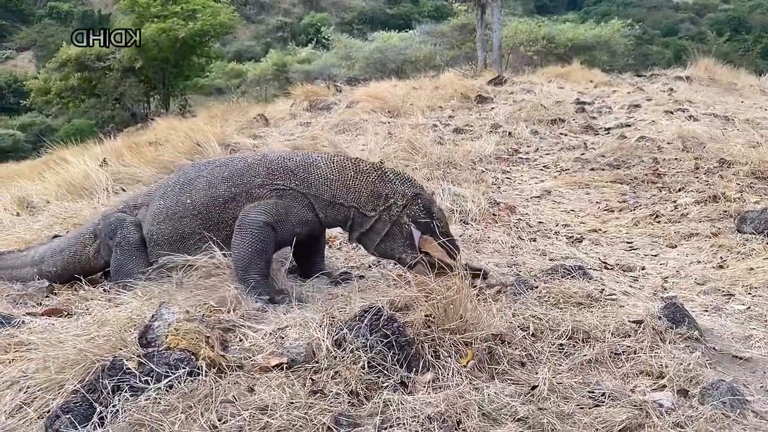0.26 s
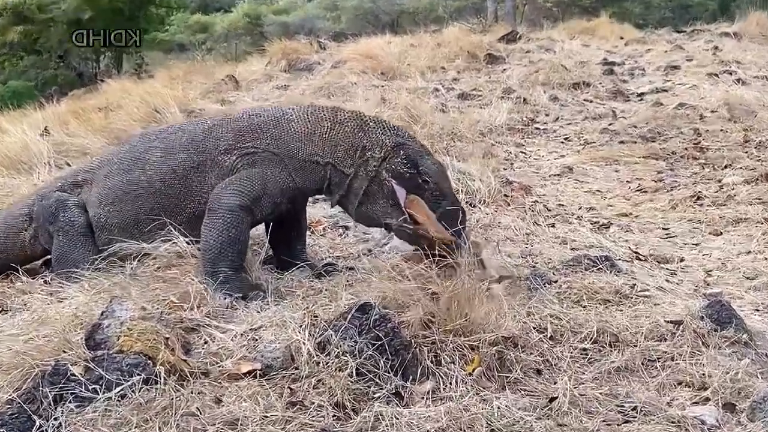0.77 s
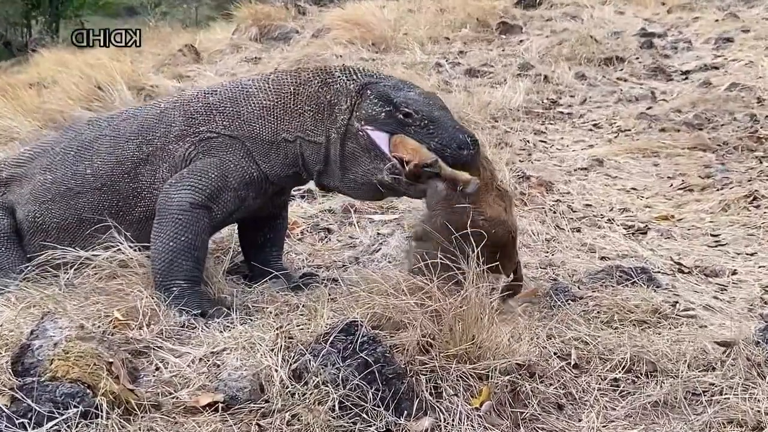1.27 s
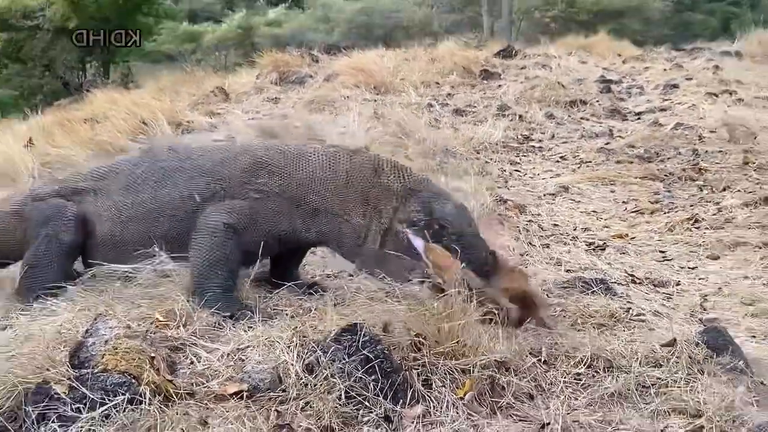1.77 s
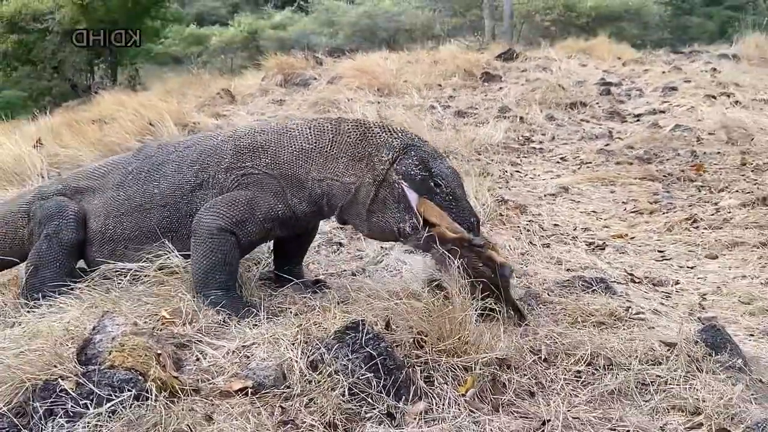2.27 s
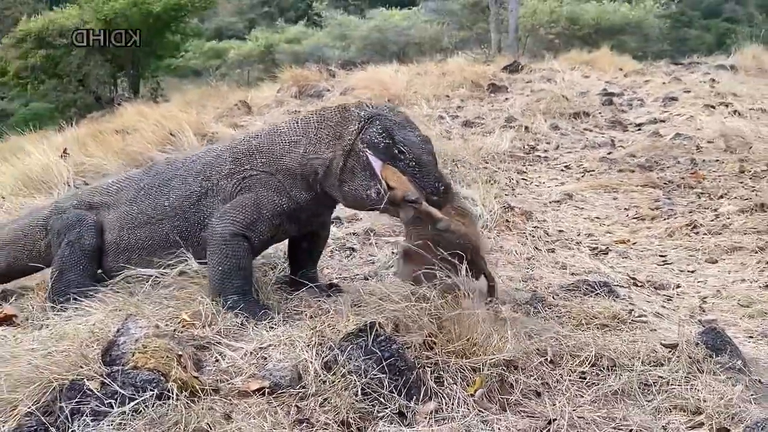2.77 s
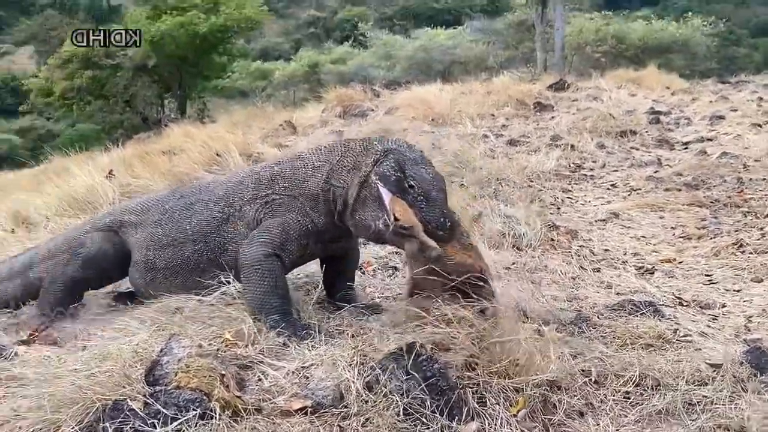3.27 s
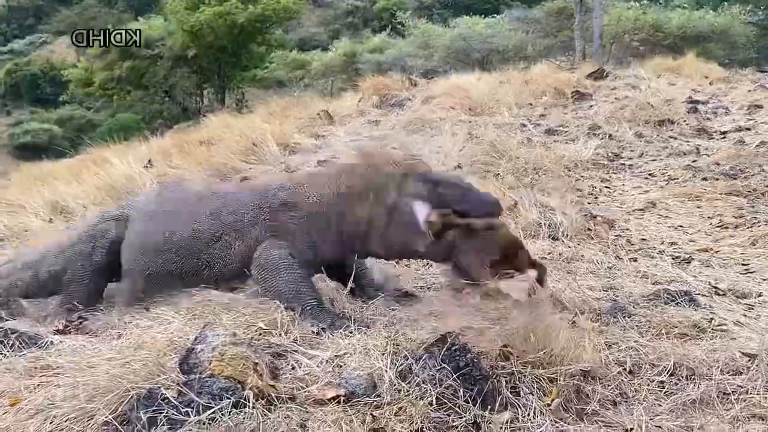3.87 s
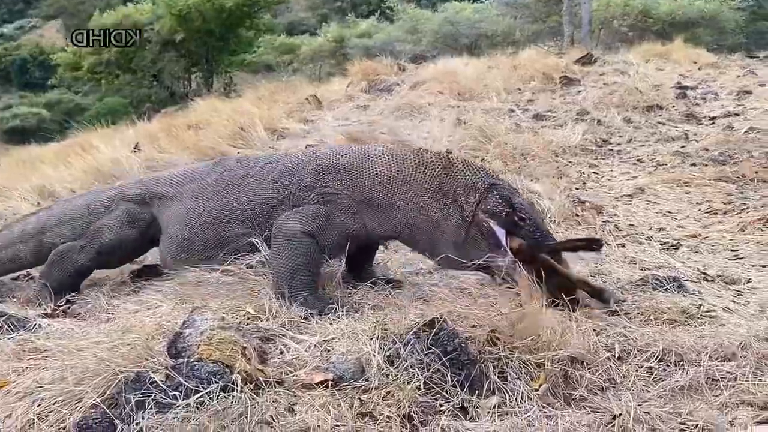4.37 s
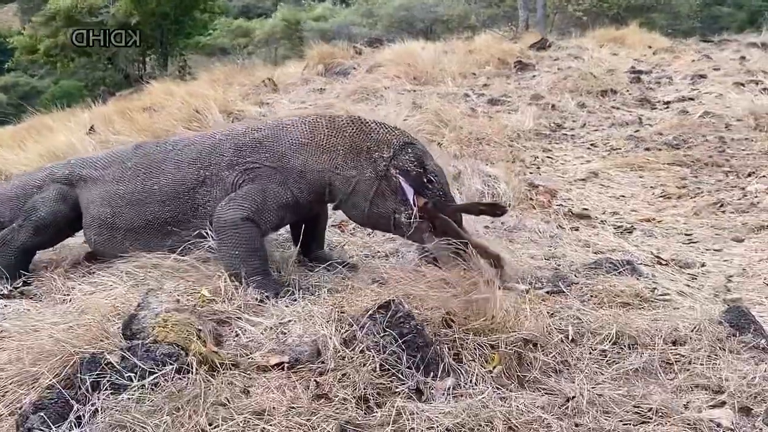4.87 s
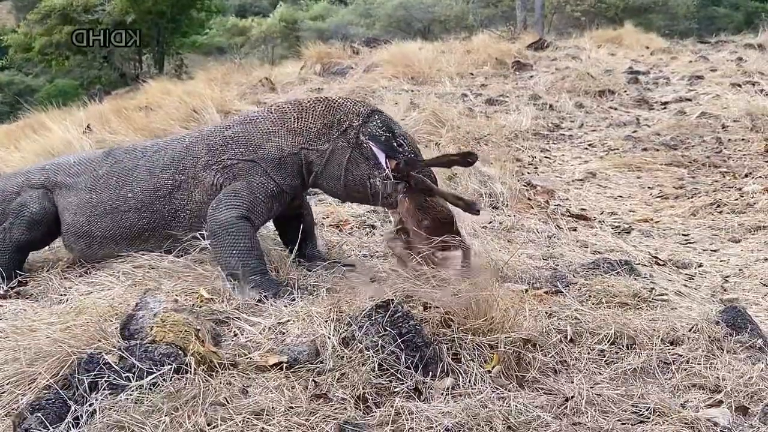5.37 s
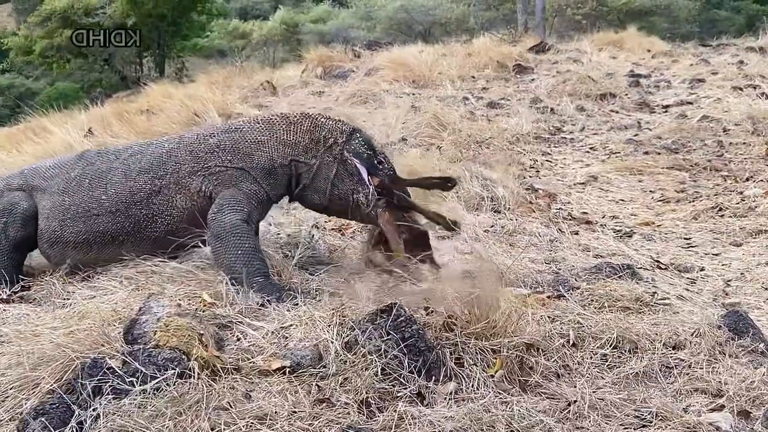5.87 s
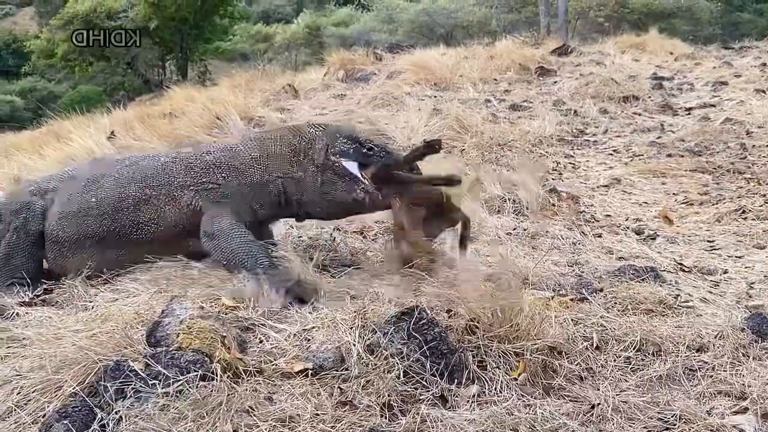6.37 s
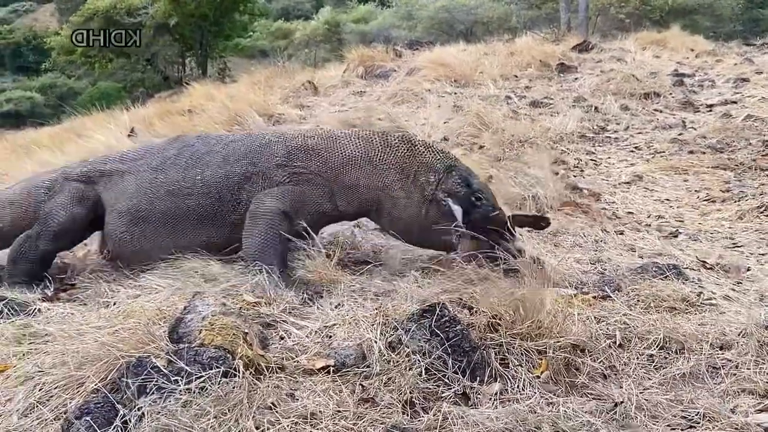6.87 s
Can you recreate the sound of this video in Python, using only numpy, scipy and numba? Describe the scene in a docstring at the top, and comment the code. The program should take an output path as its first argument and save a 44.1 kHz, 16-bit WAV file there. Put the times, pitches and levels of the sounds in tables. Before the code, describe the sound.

Gusty wind roars, rumbles and thumps on the microphone, with a very faint rustle of dry grass underneath.

```python
"""Gusty wind on a dry hillside

Wind buffets the two microphone ports of a hand-held camera, stronger on the left. Small eddies roar
and sputter, brighter the faster the air, with a lull in the middle; sharp ones slap the ports and
large ones rumble and thump. Far beneath, dry grass hisses and ticks as a big lizard thrashes a carcass."""
import sys
import numpy as np
from scipy import signal
from scipy.fft import rfft, irfft
from scipy.io import wavfile
from scipy.ndimage import uniform_filter1d, minimum_filter1d
from numba import njit

SR = 44100
rng = np.random.default_rng(int(sys.argv[2]) if len(sys.argv) > 2 else 0)


def output_pcm(signal):
    """Save a mono or channel-first signal as 16-bit PCM at the path in sys.argv[1].

    Samples are clipped to [-1, 1] before scaling.
    """
    pcm = np.clip(np.atleast_2d(signal).T, -1, 1) * 32767
    wavfile.write(sys.argv[1], SR, np.round(pcm).astype(np.int16))


N = 313992
TIME, BINS = np.arange(N) / SR, np.fft.rfftfreq(N, 1 / SR)

# Levels and corners in the tables are base values; each layer trims them.
# Bed of rustling grass: time_s, level_db
GRASS_BED = [(0.0, -59), (1.3, -56), (1.8, -53), (2.15, -56), (2.6, -51.5), (3.3, -50), (4.6, -51),
             (6.65, -50), (7.1, -54.5)]
# The carcass sweeps through the stalks: time_s, half_length_s, level_db
CARCASS_SWISHES = [(0.03, 0.03, -53.5), (1.553, 0.04, -52.5), (1.703, 0.038, -47), (3.28, .025, -51),
                   (4.005, 0.06, -49.5)]
# Tone of the dry stalks: frequency_hz, relative_db
GRASS_TONE = [(150, -11), (500, 3.5), (900, 4), (1600, 1.5), (2400, 1.5), (3100, -0.5), (4700, 2),
              (6100, 0.5), (6650, 2.5), (7400, -0.5), (9000, -2.5), (11000, -3.5), (13500, -5), (15500, -9)]
# How alike the rustle is left and right: frequency_hz, correlation
GRASS_LIKENESS = [(300, 0.039), (900, -0.066), (1500, -0.6), (2300, 1), (7000, 1), (15000, 1)]
# The rustle's short waves reach the ports out of step: frequency_hz, phase_rad
GRASS_PORT_PHASE = [(7400, 0), (9000, 3.14), (11200, 6.28), (13200, 9.42), (15000, 12.57)]

# Bed of wind between gusts: time_s, roar_db, rumble_db
WIND_BED = [(0.05, -69, -63), (.1, -51, -45), (.41, -44, -40), (.48, -28, -25.5), (.95, -26, -26),
            (1.28, -31, -28.5), (1.45, -24.5, -27.5), (2.3, -21, -18.5), (2.46, -17.5, -21.5),
            (2.78, -19.5, -20), (3.06, -46.5, -33), (3.522, -35, -38.5), (3.72, -51, -41.5),
            (3.82, -80, -62), (3.96, -60, -54), (4.07, -31, -36), (4.22, -28.5, -27.5), (5.2, -26.5, -24.5),
            (5.44, -18.5, -21), (6.48, -22, -22), (7.11, -17.5, -17.5)]
# Pressure swings of the largest eddies: frequency_hz, relative_db
RUMBLE_TONE = [(12, -49), (25, -39), (35, -14.5), (48, -7), (66, -2.5), (90, -3.5), (125, -8), (170, -10),
               (280, -18), (600, -106)]
# Large eddies thump the microphone: time_s, half_length_s, level_db, pitch_hz
EDDY_THUMPS = [(0.699, 0.015, -13.5, 68), (0.776, 0.014, -20.5, 80), (1.35, 0.018, -20.5, 75),
               (1.474, 0.021, -20, 89.9), (1.622, .02, -17.5, 93), (1.945, 0.02, -16, 100.4),
               (2.045, .016, -17, 75), (2.338, .01, -16.5, 149.8), (2.64, 0.0057, -10.5, 220.4),
               (2.759, 0.018, -11.5, 70.1), (2.94, .02, -21, 100), (3.45, 0.028, -23, 64.8),
               (3.585, 0.027, -26, 65), (3.738, .018, -39, 85), (4.115, 0.015, -13.5, 102),
               (5.207, .016, -19, 85.2), (5.654, .018, -17, 89.8), (5.693, .014, -19, 84),
               (5.868, 0.014, -19, 100), (6.02, .016, -19.5, 70), (6.075, 0.016, -15, 115),
               (6.172, 0.011, -17.5, 140), (6.21, 0.017, -17.5, 90.2), (6.387, .016, -17.5, 58),
               (6.655, .016, -21, 55)]
# Hollow notes within some of the slaps: time_s, half_length_s, level_db, pitch_hz
RIM_NOTES = [(1.763, .005, -23, 1130), (1.857, .005, -28, 1080), (2.731, .003, -22, 1800),
             (4.512, .004, -33, 1100), (4.527, .003, -27.5, 1200), (4.571, .003, -42, 1420),
             (4.749, 0.0046, -33, 960), (5.875, .004, -23, 1350), (6.066, .0022, -21, 1700),
             (6.064, .002, -26.5, 2750), (6.238, .0025, -30, 1680)]
# Gusts riding on the bed: start_s, length_s, level_db, corner_hz
WIND_GUSTS = [(0.126, .04, -40, 190), (0.28, 0.048, -33.5, 220), (.355, .012, -41, 230),
              (.514, .02, -20, 370), (0.56, 0.082, -20.5, 403), (0.625, 0.058, -20, 660),
              (0.8, 0.041, -26, 380), (0.875, 0.038, -27, 644), (0.997, 0.09, -20, 536),
              (1.158, .03, -30, 480), (1.365, 0.034, -28, 560), (1.404, 0.077, -20.5, 614),
              (1.59, 0.041, -21, 645), (1.673, 0.038, -22, 846), (1.775, 0.042, -19, 970),
              (1.924, .13, -15.5, 890), (2.107, 0.023, -16.5, 775), (2.153, 0.017, -17, 1040),
              (2.381, 0.058, -15.5, 1060), (2.502, 0.16, -21.5, 1430), (2.683, 0.073, -16, 1100),
              (2.888, 0.052, -22.5, 570), (2.962, 0.021, -26.5, 340), (3.128, .012, -38, 200),
              (3.234, 0.041, -31.5, 190), (3.408, 0.064, -24, 390), (3.564, 0.039, -32.5, 270),
              (4.08, 0.044, -21, 596), (4.453, 0.13, -22, 474), (4.681, 0.053, -25, 520),
              (5.002, 0.11, -25, 440), (5.173, 0.032, -19.5, 380), (5.253, 0.03, -22.5, 580),
              (5.301, 0.02, -16.5, 646), (5.391, 0.071, -17, 1014), (5.596, 0.068, -19.5, 1210),
              (5.71, 0.028, -16.5, 900), (5.835, 0.038, -15, 1230), (6.07, 0.079, -18, 950),
              (6.351, 0.11, -20, 910), (6.57, 0.098, -18, 1040), (6.711, 0.11, -17.5, 1230),
              (6.828, 0.089, -18, 1230), (7.06, 0.027, -18.5, 1050)]
# Moments when the wind drops: time_s, half_length_s, depth_db
WIND_LULLS = [(0.473, .006, 8), (0.499, 0.012, 7), (0.71, 0.022, 5.5), (1.137, 0.019, 14), (1.29, .028, 7),
              (1.832, 0.01, 7.5), (1.913, .009, 4), (2.097, 0.0093, 6), (2.144, .006, 5),
              (2.313, 0.017, 5.5), (2.492, .01, 3), (2.567, .005, 5), (2.674, .006, 6), (2.857, .016, 4),
              (3.105, 0.018, 3), (3.357, 0.026, 2), (4.16, 0.025, 5.5), (4.375, .014, 3),
              (4.437, 0.0098, 5.5), (4.613, 0.022, 6), (4.674, .008, 3), (4.775, .012, 5),
              (4.95, .012, 4.5), (4.986, .012, 6), (5.144, 0.015, 13), (5.345, .022, 4), (5.486, .008, 7),
              (5.593, .006, 6), (5.787, 0.027, 3), (5.91, 0.024, 4), (6.034, 0.021, 12.5),
              (6.233, 0.018, 3), (6.33, 0.012, 4), (6.703, 0.0048, 7), (6.965, 0.011, 5.5)]
# Sharp eddies slap the ports: start_s, length_s, level_db, centre_hz, width_hz
EDDY_SLAPS = [(0.433, 0.009, -11, 290, 330), (0.45, .012, -24.5, 230, 740), (.479, .006, -26, 200, 480),
              (0.679, 0.009, -18, 330, 880), (0.767, 0.0055, -13.5, 430, 704),
              (1.062, 0.0072, -18, 200, 980), (1.212, 0.012, -13.5, 494, 540),
              (1.266, 0.0027, -28.5, 450, 650), (1.33, 0.018, -17, 490, 583),
              (1.419, .007, -17.5, 100, 1150), (1.554, .003, -25, 700, 700), (1.592, .018, -16, 252, 530),
              (1.757, 0.01, -11.5, 280, 816), (1.775, 0.005, -21, 300, 1490),
              (1.848, 0.019, -20.5, 400, 700), (1.923, 0.025, -13, 100, 1200),
              (1.956, 0.017, -9.5, 250, 800), (2.015, .028, -17, 150, 900), (2.151, .006, -15, 100, 1250),
              (2.167, 0.007, -17, 100, 1860), (2.244, 0.024, -18, 382, 970),
              (2.384, 0.005, -15.5, 200, 1500), (2.394, .004, -12.5, 200, 1850),
              (2.426, 0.0047, -12, 100, 1500), (2.501, .003, -23, 300, 2200), (2.519, .004, -17, 200, 1900),
              (2.552, .005, -14, 200, 1800), (2.572, .005, -17, 400, 2000), (2.679, .01, -17, 600, 1800),
              (2.713, 0.024, -11.5, 220, 1160), (2.7255, 0.005, -11, 700, 2150),
              (2.789, 0.0099, -9, 540, 700), (2.828, .008, -20, 400, 950), (3.21, 0.0028, -34.5, 300, 750),
              (3.332, 0.0047, -40.5, 350, 450), (3.441, 0.0062, -15, 100, 493),
              (3.53, 0.0076, -20.5, 290, 500), (3.598, .004, -29, 250, 650),
              (3.712, 0.021, -40.5, 170, 260), (4.097, .005, -17, 550, 680), (4.112, .011, -20, 100, 900),
              (4.458, .004, -18.5, 300, 750), (4.507, .01, -23, 200, 900), (4.56, 0.0082, -20.5, 100, 890),
              (4.647, 0.0028, -22, 300, 600), (4.682, 0.0076, -15, 430, 390),
              (4.728, 0.0028, -20, 524, 900), (4.792, 0.0023, -22.5, 600, 750),
              (4.809, .003, -27, 600, 600), (4.825, .003, -26, 600, 600), (4.923, 0.0067, -23.5, 400, 600),
              (4.964, 0.0064, -29, 600, 600), (5.008, 0.0034, -19.5, 398, 546),
              (5.046, 0.0094, -23.5, 397, 680), (5.183, 0.0019, -21.5, 100, 1450),
              (5.306, .008, -15, 380, 550), (5.318, 0.0027, -17, 398, 1120),
              (5.496, 0.0066, -16.5, 190, 1350), (5.6, 0.0078, -15.5, 100, 1650),
              (5.644, 0.0098, -11.5, 100, 1500), (5.742, 0.0054, -12, 300, 1200),
              (5.868, 0.0078, -14, 100, 1640), (6.061, 0.008, -8.5, 200, 1950),
              (6.189, 0.024, -13, 350, 850), (6.234, 0.0053, -24, 500, 1300), (6.317, .004, -21, 400, 1000),
              (6.353, 0.01, -13, 100, 1770), (6.418, 0.0047, -14, 100, 1100),
              (6.597, 0.01, -16.5, 100, 1900), (6.71, 0.016, -8.5, 100, 1640),
              (6.742, 0.0036, -17, 100, 2300), (6.781, 0.018, -15, 100, 1500),
              (6.880, 0.023, -15, 100, 1920), (6.927, 0.0055, -7, 430, 1370), (6.984, .006, -13, 200, 940),
              (7.02, 0.0039, -17, 200, 1350), (7.064, .005, -17, 100, 1700)]
# How the ports colour the wind: frequency_hz, gain_db
PORT_TONE = [(300, 0), (500, -0.33), (790, 0.86), (1200, -1.5), (1650, 0), (2300, 2), (4000, 1.5)]
# How alike the wind is in the two ports: frequency_hz, correlation
WIND_LIKENESS = [(30, .99), (60, .975), (100, .93), (180, .8), (330, .85), (550, .85), (950, .78),
                 (1500, .72), (2000, .97), (2500, .99)]
# The wind leans to the left: frequency_hz, left_minus_right_db
WIND_LEAN = [(250, 0), (330, .5), (490, 2.6), (750, 4.8), (1150, 6), (1600, 4.5), (2100, 1.2), (2700, .3)]
# The air passes the left port first: frequency_hz, phase_rad
WIND_PORT_PHASE = [(100, 0.034), (430, 0.066), (1100, 0)]


def amp(db):
    """Decibels to gain."""
    return 10 ** (np.asarray(db) / 20)


def unit(x):
    """Scales to rms 1."""
    return x / np.sqrt(np.mean(x ** 2) + 1e-20)


def curve(points):
    """Draws a table across the spectrum on a log-frequency axis."""
    hz, value = np.transpose(points)
    return np.interp(np.log(BINS + 1), np.log(hz + 1), value)


def equalised(x, tone):
    """Plays x through an EQ curve."""
    return irfft(rfft(x) * amp(curve(tone)), N)


def steadied(x, span_s):
    """Rides out swells slower than span_s, keyed from the first row; the quick ones stay."""
    power = uniform_filter1d(x[0] ** 2, int(span_s * SR))
    power = uniform_filter1d(power, int(span_s * SR / 2))
    return x / np.sqrt(abs(power) + 1e-20)


def flutter(rate_hz):
    """A smooth random wobble of rms 1, up to about rate_hz."""
    return unit(irfft(rfft(rng.standard_normal(N)) / (1 + (BINS / rate_hz) ** 4), N))


def bell(time_s, half_length_s):
    """A smooth swell of height 1 around time_s."""
    return np.exp(-((TIME - time_s) / half_length_s) ** 2)


def ports(pair, likeness, phase, balance_db=0):
    """Spreads a common and a differing row into the left and right ports."""
    common, differing = rfft(pair)
    correlation = np.clip(curve(likeness), -1, 1)
    mid = common * np.sqrt((1 + correlation) / 2)
    side = differing * np.sqrt((1 - correlation) / 2)
    lean = amp(balance_db / 2) * np.exp(1j * curve(phase) / 2)
    return irfft(np.array([(mid + side) * lean, (mid - side) / lean]), N)


def grass(hiss_db=3, tick_db=-11, ticks_per_s=330, tick_decay_s=0.00023, spread_db=4.5, wobble_db=0.6):
    """Dry stalks brush together in a hiss that swells as the carcass sweeps by; single ones snap."""
    hiss = rng.standard_normal((2, N)) * amp(wobble_db * flutter(rate_hz=40))
    hiss = unit(equalised(hiss, GRASS_TONE))
    snapping = rng.random((2, N)) < ticks_per_s / SR
    snaps = snapping * amp(spread_db * np.minimum(rng.exponential(1, (2, N)), 5.5))
    tails = signal.lfilter([1], [1, -np.exp(-1 / (tick_decay_s * SR))], snaps)
    ticks = unit(equalised(tails * rng.standard_normal((2, N)), GRASS_TONE))
    bed_db = np.interp(TIME, *np.transpose(GRASS_BED)) + wobble_db * flutter(rate_hz=9)
    swish_power = sum((amp(db) * bell(time_s, half_s)) ** 2 for time_s, half_s, db in CARCASS_SWISHES)
    return (amp(hiss_db) * hiss + amp(tick_db) * ticks) * np.sqrt(amp(bed_db) ** 2 + swish_power)


def rumble(gust_db, gust_share=0.37, lump_hz=11, lump_db=1.35):
    """Large eddies heave against the microphone in soft lumps, following the gusts only a little."""
    time_s, _, bed_db = np.transpose(WIND_BED)
    pressure = unit(equalised(rng.standard_normal((2, N)), RUMBLE_TONE))
    level_db = np.interp(TIME, time_s, bed_db) + gust_share * gust_db + lump_db * flutter(lump_hz)
    return steadied(pressure, span_s=0.1) * amp(level_db)


def thumps(trim_db=-1, sag=0.15):
    """A large eddy shoves the microphone through a few swings, slowing as it passes."""
    out = np.zeros(N)
    for time_s, half_s, level_db, pitch_hz in EDDY_THUMPS:
        sagging_hz = pitch_hz * (1 - sag * np.tanh((TIME - time_s) / half_s))
        cycles = np.cumsum(sagging_hz) / SR + rng.random()
        out += amp(level_db + trim_db) * bell(time_s, half_s) * np.sqrt(2) * np.cos(2 * np.pi * cycles)
    return out


def rim_notes(waver=0.0497, waver_hz=200, lean_db=4):
    """Air catches the rim of a port: a short, wavering, hollow note, stronger on the left."""
    out = np.zeros(N)
    wavering_time = np.cumsum(1 + waver * flutter(waver_hz)) / SR
    for time_s, half_s, level_db, pitch_hz in RIM_NOTES:
        tone = np.sqrt(2) * np.sin(2 * np.pi * pitch_hz * wavering_time)
        out += amp(level_db) * bell(time_s, half_s) * tone
    return out * amp([[lean_db / 2], [-lean_db / 2]])


def airflow(still_hz=153, rise_hz=612, brightening=0.75, attack_s=0.0039, release_s=0.01, dulling=0.54):
    """Gusts rise, hold and die over the bed; stronger wind is brighter, and a lull is quiet and dull."""
    time_s, roar_db, _ = np.transpose(WIND_BED)
    bed_db = np.interp(TIME, time_s, roar_db)
    bed_hz = still_hz + rise_hz * amp(brightening * (bed_db + 20))
    power = amp(bed_db) ** 2
    weighted_hz = power * bed_hz  # the loudest air sets the tone
    for start_s, length_s, peak_db, gust_hz in WIND_GUSTS:
        attack = np.clip((TIME - start_s) / attack_s, 0, 1)
        release = np.exp(-np.clip((TIME - start_s - length_s) / release_s, 0, 20))
        gust_power = (amp(peak_db) * attack * release) ** 2
        power += gust_power
        weighted_hz += gust_power * gust_hz
    lull_db = sum(depth_db * bell(time_s, half_s) for time_s, half_s, depth_db in WIND_LULLS)
    level_db = 10 * np.log10(power) - lull_db
    base_corner_hz = weighted_hz / power * amp(-dulling * lull_db)
    return level_db, base_corner_hz, level_db - bed_db


@njit
def churn(noise, corner_hz, damping=2.07):
    """Three swept two-pole low-passes turn noise to turbulence: the smallest eddies die out steeply."""
    step = np.minimum(2 * np.pi * corner_hz / SR, 1)
    out = np.empty_like(noise)
    for row in range(2):
        low, band = np.zeros(3), np.zeros(3)
        for i in range(len(step)):
            value = noise[row, i]
            for k in range(3):
                band[k] = (band[k] + step[i] * (value - low[k])) / (1 + step[i] * damping)
                low[k] += step[i] * band[k]
                value = low[k]
            out[row, i] = value
    return out


def stall(depth_db=7, half_length_s=0.0027, lead_s=0.006):
    """The air hangs for an instant just before each sharp eddy breaks: a dip in dB."""
    dips_s = np.transpose(EDDY_SLAPS)[0] - lead_s
    nearest = np.rint(np.interp(TIME, dips_s, np.arange(len(dips_s)))).astype(int)
    return -depth_db * bell(dips_s[nearest], half_length_s)


def roar(level_db, base_corner_hz, top_surge=2.2, push_db=0.96, bright_db=1.9, trim_db=0.46):
    """Small eddies surge louder and brighter: a fitful sputter in weak wind, a dense rip in fast air."""
    haste = np.clip((base_corner_hz - 500) / 450, 0, 1)
    surge = np.sqrt(1 - haste) * flutter(rate_hz=210) + np.sqrt(haste) * flutter(rate_hz=330)
    surge = top_surge * np.tanh(surge / top_surge)
    corner_hz = 1.416 * base_corner_hz * amp(bright_db * surge)
    pressure = churn(rng.standard_normal((2, N)) * amp(push_db * surge), corner_hz)
    low_cut = signal.butter(2, 130, "high", fs=SR, output="sos")
    pressure = signal.sosfilt(low_cut, pressure)
    weakness = np.clip((-20 - level_db) / 12, 0, 1)  # below -20 dB the wind sways more
    sway_db = (1.16 + 2.2 * weakness) * flutter(rate_hz=26)
    return steadied(pressure, span_s=0.023) * amp(level_db + sway_db + stall() + trim_db)


def slaps(attack_s=0.0013, steepness=5.3, low_cut_hz=130, trim_db=0.17, size=4096):
    """A sharp eddy hits at once and is gone: a broad thud with no ring. The shortest are mere ticks."""
    out = np.zeros((2, N + size))
    t, hz = np.arange(size) / SR, np.fft.rfftfreq(size, 1 / SR)
    low_cut = hz ** 2 / np.hypot(hz ** 2, low_cut_hz ** 2)
    attack = np.sin(np.pi / 2 * np.minimum(t / attack_s, 1)) ** 2
    for start_s, length_s, level_db, centre_hz, width_hz in EDDY_SLAPS:
        hump = low_cut * (1 + ((hz - centre_hz) / width_hz) ** 2) ** (-steepness / 2)
        hold_s, release_s = 0.782 * length_s, min(0.00082 + 0.33 * length_s, 0.0042)
        envelope = attack / np.cosh(np.clip((t - hold_s) / release_s, 0, 20))
        slap = rng.standard_normal((2, size)) * envelope
        for _ in range(3):  # spreads the energy smoothly over the hump, so no note stands out
            slap = irfft(hump * np.exp(1j * np.angle(rfft(slap)))) * envelope
        slap /= np.sqrt((slap ** 2).sum(1, keepdims=True) / (length_s * SR))
        start = int(start_s * SR)
        out[:, start:start + size] += amp(level_db + trim_db) * slap
    return out[:, :N]


def scene():
    """Wind on the ports, up front and leaning left, over the faintly rustling hillside."""
    level_db, base_corner_hz, gust_db = airflow()
    air = equalised(roar(level_db, base_corner_hz) + rumble(gust_db) + slaps(), PORT_TONE)
    wind = ports(air, WIND_LIKENESS, WIND_PORT_PHASE, balance_db=curve(WIND_LEAN))
    return wind + rim_notes() + thumps() + ports(grass(), GRASS_LIKENESS, GRASS_PORT_PHASE)


def record(dry, ceiling=0.97, high_cut_hz=15800):
    """A limiter ducks the tallest peaks, then a steep high cut takes off the very top."""
    safe_gain = np.minimum(1, ceiling / (abs(dry).max(0) + 1e-9))
    limited = dry * uniform_filter1d(minimum_filter1d(safe_gain, size=300), size=300)
    high_cut = signal.firwin(511, high_cut_hz, window=("kaiser", 9), fs=SR)
    return signal.oaconvolve(limited, high_cut[None], "same")


dry = scene()
out = record(dry)
output_pcm(out)
```